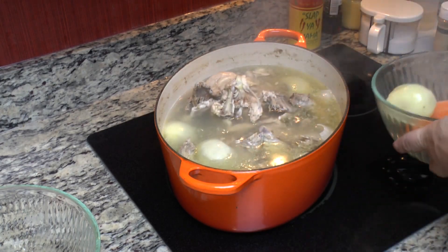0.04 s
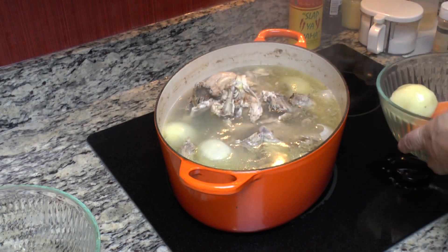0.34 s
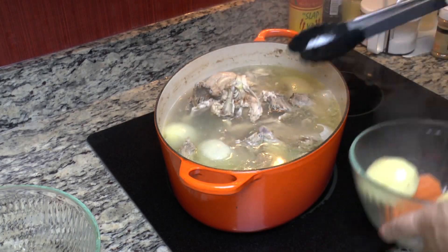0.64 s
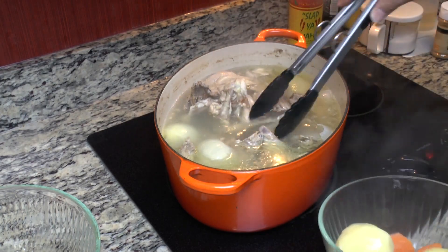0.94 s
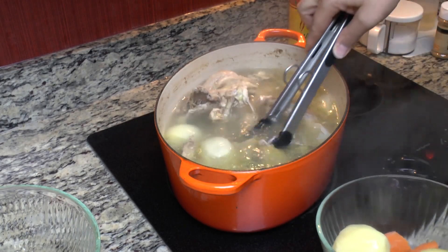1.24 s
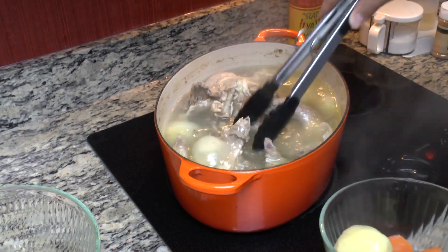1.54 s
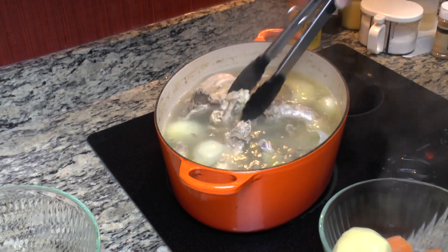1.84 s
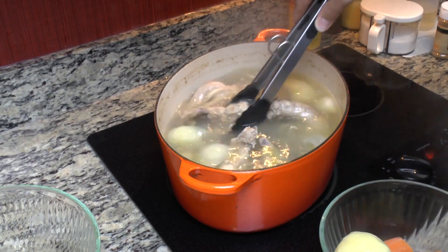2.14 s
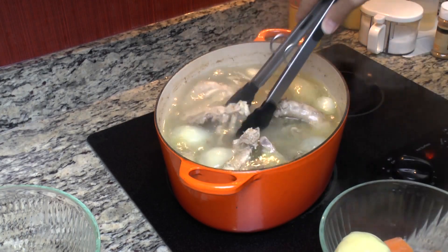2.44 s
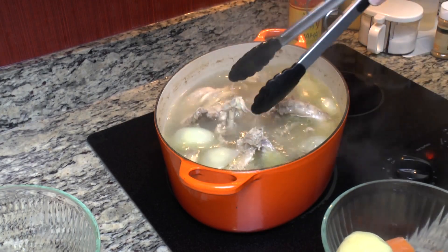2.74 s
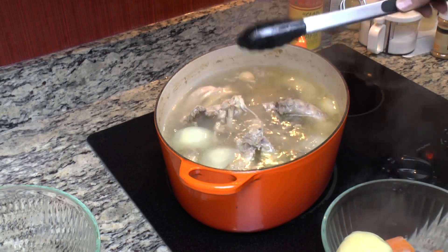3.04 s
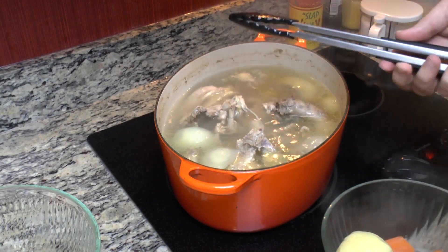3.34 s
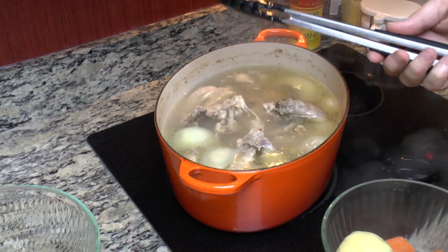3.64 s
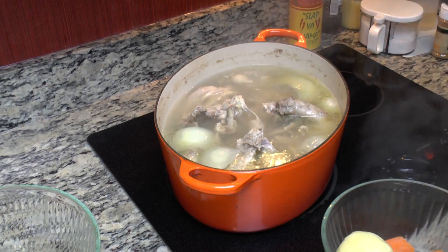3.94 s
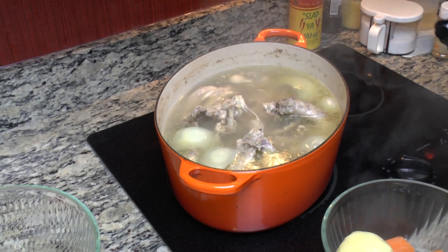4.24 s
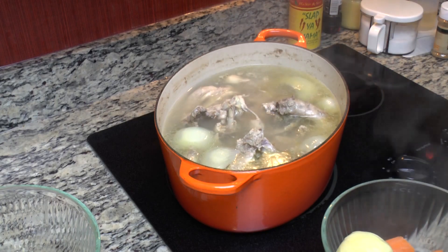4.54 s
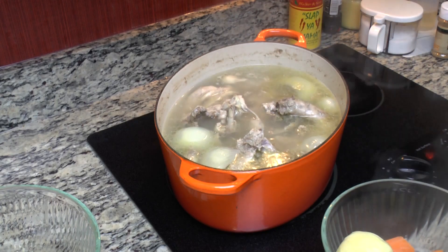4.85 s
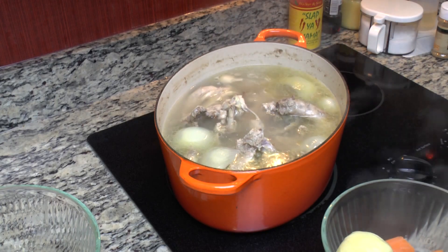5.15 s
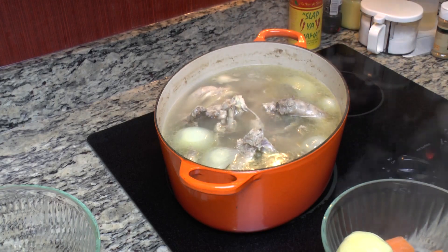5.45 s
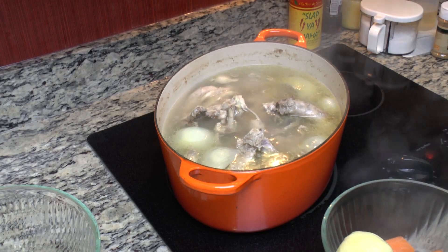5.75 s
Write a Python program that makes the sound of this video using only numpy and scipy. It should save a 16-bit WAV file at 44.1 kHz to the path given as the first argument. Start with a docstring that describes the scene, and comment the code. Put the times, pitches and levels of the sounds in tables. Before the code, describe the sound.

A faint hiss of simmering stock, with tiny bubble pops, runs throughout over a low appliance hum in a small kitchen. At about 0.5 seconds a glass bowl taps and slides very quietly. At 1.3 seconds plastic-tipped steel tongs thud and clack on the bottom of an enamelled iron pot. They knock its wall at 1.6 and 1.8 seconds, then loudly at 2 seconds, each blow ringing briefly while the simmer swells a little. A very faint, high steam whistle wavers from 2.5 seconds, with a few light knocks around 2.8. At 3.6 seconds the tongs snap shut with a loud, sharp click. Only simmer and hum remain until soft taps at 5 seconds. From 5.3 to 5.5 seconds the tongs land on a stone counter, clattering, skidding and ringing brightly. Everything sounds close, with a short room reverberation.

```python
"""Stock simmers and hisses in an enamelled iron pot over the low hum of a small kitchen.
A glass bowl slides and taps. Steel tongs with plastic tips push meat about, thud on the bottom of
the pot and knock its wall into ringing; bubbles burst and steam briefly whistles. The tongs are snapped
shut, then laid on the stone counter, where they skid and ring. Every blow excites the room's
reverberation, and an automatic gain control ducks after the hardest ones."""
import sys
import numpy as np
from scipy import signal
from scipy.fft import rfft, irfft, next_fast_len
from scipy.io import wavfile
from scipy.ndimage import uniform_filter1d, map_coordinates

SR = 44100
rng = np.random.default_rng(int(sys.argv[2]) if len(sys.argv) > 2 else 0)


def master_out(mix):
    """Clip the mix to full scale and print it as 16-bit PCM to the path in sys.argv[1]."""
    frames = np.transpose(np.atleast_2d(mix))
    ceiling = np.clip(frames, -1, 1)
    pcm = np.round(ceiling * 32767).astype(np.int16)
    wavfile.write(sys.argv[1], SR, pcm)


N = 264153
T = np.arange(N) / SR
AGE = T[:SR * 3 // 4]  # seconds since a contact


def amp(db):
    """Amplitude ratio of a level in decibels."""
    return 10 ** (np.asarray(db) / 20)


def unit(x):
    """Power normalisation: x at rms 1."""
    return x / np.sqrt(np.mean(x ** 2) + 1e-20)


def blow(x):
    """Energy normalisation: x with the energy of 10 ms at rms 1."""
    return x / np.sqrt(np.sum(x ** 2) * 100 / SR + 1e-20)


def along(points):
    """Curve interpolated through (Hz, value) points on a logarithmic frequency axis."""
    hz, values = np.transpose(points)
    return lambda f: np.interp(np.log(f + 1), np.log(hz), values)


def hump(hz):
    """Response in dB of a broad resonance centred on hz."""
    return lambda f: -40 * np.tanh(0.75 * np.log2((f + 1) / hz) ** 2)


def wobble(rate):
    """Smooth random modulation with rate knots a second."""
    return map_coordinates(rng.standard_normal(int(N * rate / SR) + 4), [T * rate])


def envelope(start, length, attack, release):
    """Exponential rise, hold and decay; attack and release are time constants in seconds."""
    age = np.maximum(T - start, 0)
    return (1 - np.exp(-age / attack)) * np.exp(-np.maximum(age - length, 0) / release)


def coloured(x, curve):
    """Minimum-phase filtering: a causal response whose gain in dB is curve(Hz)."""
    size = 2 * next_fast_len(x.shape[-1] // 2 + 4096)
    cepstrum = irfft(np.log(amp(curve(np.fft.rfftfreq(size, 1 / SR))) + 1e-6))
    cepstrum[1:size // 2] *= 2
    cepstrum[size // 2 + 1:] = 0
    return irfft(rfft(x, size) * np.exp(rfft(cepstrum)))[..., :x.shape[-1]]


def shelved(x, bass_db, treble_db, treble_hz, bass_hz=550):
    """Spectral shelving: a heavier contact adds bass, a harder one treble."""
    return coloured(x, lambda f: bass_db / (1 + (f / bass_hz) ** 6)
                    + treble_db / (1 + (treble_hz / (f + 1)) ** 8))


def burst(curve, t60, spike):
    """Impulsive excitation: a spike and a dense, dying chatter, filtered by a body's response."""
    chatter = rng.standard_normal(len(AGE)) * amp(-60 * AGE / t60)
    chatter /= np.linalg.norm(chatter)
    chatter[0] = spike
    # a blow excites all bands evenly, so the colour is the body's alone
    band_power = uniform_filter1d(np.abs(rfft(chatter)) ** 2, size=90)
    uneven_db = 10 * np.log10(np.abs(band_power) + 1e-9)
    hz = np.fft.rfftfreq(len(AGE), 1 / SR)
    return blow(coloured(chatter, lambda f: curve(f) - np.interp(f, hz, uneven_db)))


def ring(modes):
    """Free vibration: damped modes, struck at slightly new strengths every time."""
    hz, db, t60 = np.transpose(modes)[:, :, None]
    strength_db = db + rng.standard_normal(hz.shape)
    sign = rng.choice([-1, 1], hz.shape)
    partials = sign * amp(strength_db - 60 * AGE / t60) * np.sin(2 * np.pi * hz * AGE)
    return blow(np.sum(partials, axis=0))


def add_in_room(out, start_s, x, room_db, pan_db, side_db=-7, early_gain=2.98):
    """Reverberation: x joins out as direct sound, early reflections and the kitchen's diffuse tail."""
    # Each row: frequency in Hz, reverberation time (t60) in seconds.
    decay_times = [(150, .36), (700, .4), (2500, .46), (5000, .42), (9000, .32), (15000, .23)]
    # Each row: frequency in Hz, relative level in dB of the reverberation's left-right difference.
    width = [(120, -2), (500, 4), (1200, 4), (4000, 1.5), (12000, -3.5)]
    hz, t, noise = signal.stft(rng.standard_normal((2, len(AGE))), SR, nperseg=256)
    decay = amp(-60 * t / along(decay_times)(hz)[:, None]) + early_gain * amp(-60 * t / 0.062)
    build_up = 1 - np.exp(-AGE / 0.0018)
    mid, side = signal.istft(noise * decay, SR, nperseg=256)[1][:, :len(AGE)] * build_up
    side_gain = amp(side_db + along(width)(np.fft.rfftfreq(len(AGE), 1 / SR)))
    side = irfft(rfft(side) * side_gain, len(AGE))
    response = amp(room_db) * np.array([mid + side, mid - side]) / np.linalg.norm(mid)
    response[:, 0] += amp([pan_db / 2, -pan_db / 2])  # the direct path
    start = round(start_s * SR)
    heard = signal.fftconvolve(x[None], response, axes=1)[:, :N - start]
    out[:, start:start + heard.shape[1]] += heard


def air(spectrum, side_db):
    """Steady coloured noise, highly correlated between the channels."""
    mid, side = unit(coloured(rng.standard_normal((2, N)), along(spectrum)))
    return np.array([mid + amp(side_db) * side, mid - amp(side_db) * side])


def simmer_strength(rest_db=-65):
    """Incoherent addition: the resting simmer and its surges sum in power to give the hiss amplitude."""
    # The simmer surges mostly where the stock is disturbed.
    # Each row: start in seconds, length in seconds, level of the added hiss in dB.
    surges = [(0, 1.7, -64.5), (1.4, 0.82, -60.5), (2.5, 1.5, -63.5), (5.55, .35, -63.5)]
    surge_power = sum((amp(db) * envelope(start, length, attack=0.092, release=0.083)) ** 2
                      for start, length, db in surges)
    return np.sqrt(amp(rest_db) ** 2 + surge_power)


def background():
    """Broadband noise and line spectrum: the simmer hisses over an appliance's rush and wavering hum."""
    # Spectra of the simmer and the appliance's rush. Each row: frequency in Hz, relative level in dB.
    hiss_spectrum = [(500, -28), (1000, -5), (1500, 3.5), (2500, 3.5), (4200, 0), (6000, -4), (9000, -11.5),
                     (15800, -14.5)]
    rush_spectrum = [(20, -13.5), (54, -2.5), (96, -6.5), (166, 0), (280, -6.5), (370, -6.5), (425, -8),
                     (490, -21), (560, -17.5), (720, -14), (950, -30), (1300, -38), (2500, -80.5)]
    # The appliance's tones. Each row: frequency in Hz, level in dB.
    hum_tones = [(161, -64), (357, -72), (560, -82), (703, -73), (1400, -86)]
    hiss = simmer_strength() * amp(0.26 * wobble(14)) * air(hiss_spectrum, side_db=-17)
    hum = sum(amp(db + 2 * wobble(6)) * np.sin(2 * np.pi * hz * T + 1.3 * wobble(16))
              for hz, db in hum_tones)
    rush = amp(-55 + 0.22 * wobble(6.2)) * air(rush_spectrum, side_db=-12)
    return hiss + hum + rush


def bubbles(count=12, centre_hz=4800, spread_octaves=0.45):
    """Bursting bubbles excite brief resonances: a few loud pops, count small ones and a fine fizz."""
    # The loudest wet clicks and bubbles.
    # Each row: start in seconds, level in dB, centre frequency in Hz, t60 in seconds.
    pops = [(0.888, -56, 6940, 0.049), (1.154, -59.5, 7400, .03), (1.302, -50, 3760, 0.054),
            (1.638, -53.5, 8600, .08), (1.727, -49.5, 5740, .06), (1.852, -56.5, 5550, 0.035),
            (1.93, -52, 2720, 0.22), (1.944, -49.5, 2300, .16), (1.984, -53, 5240, 0.051),
            (2.020, -51, 6020, 0.11), (2.938, -52, 4600, .04), (3.193, -59.5, 4560, 0.049),
            (3.374, -57.5, 3230, 0.087), (5.926, -54.5, 5250, 0.091)]
    out = np.zeros((2, N))
    strength = simmer_strength()
    for start, db, hz, t60 in pops:
        add_in_room(out, start, amp(db) * burst(hump(hz), t60, spike=0.25), room_db=-16, pan_db=0.5)
    activity = np.cumsum(strength ** 2)  # small bubbles come more often when the simmer is lively
    for when, size, pitch in rng.random((count, 3)):
        start = T[np.searchsorted(activity, when * activity[-1])]
        hz = centre_hz * 2 ** (spread_octaves * (2 * pitch - 1))
        gain = np.median(strength) * amp(-9 + 2 * (2 * size - 1))
        add_in_room(out, start, gain * burst(hump(hz), t60=0.04, spike=0.25), room_db=-8, pan_db=-1)
    impulses = (rng.random(N) < 80 / SR) * rng.random(N) ** 2  # about 80 a second
    fizz = unit(coloured(impulses, along([(800, -27), (3000, 13), (7000, 6), (15000, -3.5)])))
    add_in_room(out, 0, fizz * strength * amp(-11.5), room_db=-10.5, pan_db=-4.5)
    return out


def bowl_slide(level_db=-64, centre_hz=1370):
    """Friction noise: the glass bowl rubs faintly over the hob."""
    out = np.zeros((2, N))
    rub = unit(coloured(rng.standard_normal(N), hump(centre_hz))) * amp(1.5 * wobble(39.5))
    motion = envelope(start=0.47, length=0.47, attack=0.23, release=0.23)
    add_in_room(out, 0, amp(level_db) * motion * rub, room_db=-7.5, pan_db=0.5)
    return out


def steam_whistle(level_db=-59.5, attack_s=0.032, release_s=0.0146):
    """Flow-induced tone: a jet of steam through a gap builds, wavers in pitch and stops."""
    # The jet's pitch contour. Each row: time in seconds, frequency in Hz.
    contour = [(2.49, 4801), (2.522, 5325), (2.592, 5850), (2.616, 5330), (2.71, 6230), (2.79, 5836),
               (2.85, 5210)]
    out = np.zeros((2, N))
    times, hz = np.transpose(contour)
    pitch = np.interp(T, times, hz) * (1 + 0.0038 * wobble(150))
    length = times[-1] - times[0] - release_s
    flow = amp(level_db + wobble(24.85)) * envelope(times[0], length, attack_s, release_s)
    add_in_room(out, 0, flow * np.sin(2 * np.pi * np.cumsum(pitch) / SR), room_db=-6, pan_db=1)
    return out


def counter_taps(hardest_t60=0.038, db_per_doubling=23):
    """Impact on stone: bowl and tongs touch the counter, and lighter taps rattle for longer."""
    # The contacts. Each row: start in seconds, level in dB, bass shelf in dB, treble shelf in dB.
    taps = [(0.547, -44.5, -7, -5), (5.0265, -46, -19, 2), (5.078, -49.5, -16, -5),
            (5.0908, -40.5, -25, -8), (5.102, -44, -7, -2), (5.332, -39, -11, -12), (5.3454, -24.5, 5, 4.5),
            (5.349, -25, 5.5, 7.5), (5.4702, -35, -11.5, 2)]
    # The counter's response. Each row: frequency in Hz, relative level in dB.
    stone_spectrum = [(60, -16.5), (160, -5), (400, -2), (560, 2), (780, -3), (1050, -7), (1600, 1.5),
                      (2400, 3.5), (3600, 0.5), (5000, -5), (8000, -20), (15500, -35)]
    # The plastic tips' modes. Each row: frequency in Hz, relative level in dB, t60 in seconds.
    tip_modes = [(752, -1, 0.079), (800, 0, 0.029), (1080, -6, 0.031), (1860, 2, 0.033)]
    out = np.zeros((2, N))
    hardest_db = max(row[1] for row in taps)
    for start, db, bass_db, treble_db in taps:
        t60 = hardest_t60 * 2 ** ((hardest_db - db) / db_per_doubling)
        tap = burst(along(stone_spectrum), t60, spike=0.076) + amp(-3.5) * ring(tip_modes)
        tap = blow(shelved(tap, bass_db, treble_db, treble_hz=3690, bass_hz=1202))
        add_in_room(out, start, amp(db) * tap, room_db=-2, pan_db=-1)
    return out


def clash_and_skid(swell_db=12):
    """Impact and stick-slip friction: the steel arms clash, ring and skid along the counter."""
    # The arms' clashes. Each row: start in seconds, ring level in dB, crack level in dB.
    clashes = [(5.347, -44.5, -27.5), (5.392, -46, -38.5), (5.411, -47, -59), (5.4925, -25, -32.5),
               (5.506, -33, -56)]
    # The steel's modes. Each row: frequency in Hz, relative level in dB, t60 in seconds.
    steel_modes = [(3693, -24, .25), (4694, -12, .12), (6208, -3, .14), (6325, -6, .16), (6804, -12, .12),
                   (7350, -12, .12), (8560, -8, .14), (10735, -7, .16), (11480, -3.5, .15),
                   (13570, -7, .14), (14336, -4, .15), (14750, -10, .09), (15560, -8, .12)]
    # The colour of a steel contact. Each row: frequency in Hz, relative level in dB.
    scrape_spectrum = [(500, -54), (1500, -9), (3000, 5.5), (5000, 2.5), (8500, -0.5), (9700, -7.5),
                       (11500, -3), (15800, 2.5)]
    # The pushes. Each row: start in seconds, length in seconds, final excitation level in dB.
    pushes = [(5.364, 0.041, -32.5), (5.444, 0.055, -37.5)]
    # Resonances of rubbed steel. Each row: frequency in Hz, bandwidth in Hz, relative level in dB.
    peaks = [(4650, 160, 1), (7300, 100, 0.5), (8520, 80, -1), (10400, 70, -1), (11460, 76, 5.5),
             (12410, 90, 1.5), (14340, 38, 3)]

    def resonances(f):
        """Lorentzian peaks summed in power, in dB."""
        power = sum(amp(db) ** 2 / (1 + (2 * (f - hz) / width) ** 2) for hz, width, db in peaks)
        return 10 * np.log10(power)

    out = np.zeros((2, N))
    for start, ring_db, crack_db in clashes:
        crack = burst(along(scrape_spectrum), t60=0.1, spike=0.34)
        clash = amp(ring_db) * ring(steel_modes) + amp(crack_db) * crack
        add_in_room(out, start, clash, room_db=-3.5, pan_db=-1.5)
    pressure = np.zeros(N)
    for start, length, db in pushes:
        remaining = np.clip(1 - (T - start) / length, 0, 1)  # a push presses harder until it stops
        pressure += amp(db - swell_db * remaining) * envelope(start, length, attack=0.006, release=0.034)
    slips = unit(rng.standard_normal(N) * amp(3.5 * wobble(400))) * pressure
    scrape = amp(-1) * unit(coloured(slips, along(scrape_spectrum)))
    singing = amp(-0.5) * unit(coloured(slips, resonances))
    add_in_room(out, 0, (scrape + singing) * np.std(slips), room_db=-4.5, pan_db=1)
    return out


def lock_snap():
    """Impact transients: the arms are squeezed shut and the lock snaps in."""
    # The clicks. Each row: start in seconds, level in dB, treble shelf in dB, rattle t60 in seconds.
    snaps = [(3.6118, -40, -25, 0.055), (3.629, -39, -10.5, 0.17), (3.640, -9.5, -2, 0.045)]
    # The lock's response. Each row: frequency in Hz, relative level in dB.
    lock_spectrum = [(300, -52), (1000, -31), (1600, -16.5), (2900, -2.5), (4700, 3), (6200, -1.5),
                     (8500, 0.5), (11000, -10.5), (15500, -5.5)]
    out = np.zeros((2, N))
    for start, db, treble_db, t60 in snaps:
        snap = burst(along(lock_spectrum), t60, spike=0.041)
        snap = blow(shelved(snap, 0, treble_db, treble_hz=4200))
        add_in_room(out, start, amp(db) * snap, room_db=-3.5, pan_db=-3.5, early_gain=3.7)
    return out


def bottom_jab(contacts=5, first_s=1.329, first_gap_s=0.003, slowing=1.4):
    """Repeated impact: the tips stutter to rest on the bottom of the pot while the arms clack."""
    # Spectra of the tips' thud and the arms' clack. Each row: frequency in Hz, relative level in dB.
    thud_spectrum = [(60, -53), (110, 1), (160, 1), (220, -6.5), (320, -6), (420, 14.5), (560, -19),
                     (760, -5), (1000, -29), (2000, -65)]
    clack_spectrum = [(500, -9), (1400, -8.5), (1900, 4.5), (2500, 2), (4200, 0), (6000, -8), (9000, -17),
                      (15000, -45)]
    # Modes of the pot's bottom and of the gripped arms.
    # Each row: frequency in Hz, relative level in dB, t60 in seconds.
    bottom_modes = [(158, -5, .24), (250, -7, .12), (318, -3, .22), (422, -2.5, .16), (554, -9, .25)]
    arm_modes = [(1940, -3, 0.044), (2450, -6, 0.068), (2940, 1, .08), (3970, -3.5, 0.07),
                 (5860, -7, 0.061)]
    out = np.zeros((2, N))
    for k in range(contacts):  # gaps widen, thud and clack weaken, the bottom's ring grows slightly
        start = first_s + first_gap_s * k ** slowing
        thud = amp(-17.5 - 6 * k) * burst(along(thud_spectrum), t60=0.079, spike=0.76)
        bottom = amp(-32 + k) * ring(bottom_modes)
        add_in_room(out, start, thud + bottom, room_db=-4.5, pan_db=2.2, side_db=-20)
        clack = burst(along(clack_spectrum), t60=0.02, spike=0.16) + amp(-5.5) * ring(arm_modes)
        add_in_room(out, start, amp(-25 - 4.5 * k) * blow(clack), room_db=-4, pan_db=0)
    return out


def pot_knocks(tip_lag_s=0.0054, rim_hz=736, rim_octaves=0.22):
    """Damped modal vibration: the two tips in turn strike the iron wall, whose ring the stock damps."""
    # The blows. Each row: start in seconds, level in dB, then bass, treble, ring and rim gains in dB.
    knocks = [(1.5954, -24, 4.5, -8.5, 2, -3.5), (1.7629, -28.5, 5, -12.5, 1, 3),
              (2.0472, -8, -2, 1.5, -2, 2.5), (2.735, -40, 8, -14, 4, -2.5), (2.803, -44, 5, -34, 7, -2),
              (2.8123, -34.5, 4, -14, 10.5, -8), (2.8535, -30.5, 2.5, -8.5, 3.5, -6.5)]
    # The wall's response. Each row: frequency in Hz, relative level in dB.
    wall_spectrum = [(53, -68), (90, -14.5), (415, -1), (626, -2), (682, 7.5), (922, -3.5), (1300, -10),
                     (1390, -3.5), (2000, -2.5), (2590, -5), (3990, -14), (5200, -17), (7290, -28.5),
                     (9050, -22), (10100, -31.5), (15500, -43)]
    # The pot's modes. Each row: frequency in Hz, relative level in dB, t60 in seconds.
    pot_modes = [(158, -14, .26), (315, -16, .25), (422, -10, .26), (555, -13, .25), (695, -4, .19),
                 (792, -3, .27), (850, -8, .2), (1068, -6, .09), (1398, 1, .15), (1615, -7, .13),
                 (1712, -8, .15), (1788, 0, .13), (1893, -10, .17), (2132, -12, .26), (2191, -6, .12),
                 (2303, -5, .14), (2499, -2, .2), (2577, -5, .2), (2665, -10, .18), (2972, -12, .22),
                 (3381, -11, .2), (4300, -13, .1), (5170, -15, .27), (7908, -17, .12), (8010, -17, .12),
                 (8732, -16, .1), (8904, -17, .13), (9390, -20, .13), (10800, -26, .14), (11700, -27, .14),
                 (13100, -25, .1), (14800, -27, .12)]
    out = np.zeros((2, N))
    for start, db, bass_db, treble_db, ring_db, rim_db in knocks:
        for tip in (0, 1):  # the second tip lands softer and with less ring
            contact = burst(along(wall_spectrum), t60=0.051, spike=0.27)
            hit = contact + amp(ring_db - 10.5 * tip) * ring(pot_modes)
            # a blow high on the wall brings out the rim's modes
            hit = coloured(hit, lambda f: rim_db * np.exp(-(np.log2((f + 1) / rim_hz) / rim_octaves) ** 2))
            hit = amp(db - 3 * tip) * blow(shelved(hit, bass_db, treble_db, treble_hz=2530))
            add_in_room(out, start + tip * tip_lag_s, hit, room_db=-3, pan_db=0.7, side_db=-12.5)
    return out


def scene():
    """Superposition of everything heard at the stove."""
    contacts = pot_knocks() + bottom_jab() + lock_snap() + counter_taps() + clash_and_skid()
    return contacts + bowl_slide() + bubbles() + steam_whistle() + background()


def lag(x, tau):
    """First-order smoothing with a time constant of tau seconds."""
    pole = np.exp(-1 / (tau * SR))
    return signal.lfilter([1 - pole], [1, -pole], x)


def gain_control(x, limit_db=-15, release_db_per_s=30, attack_s=0.00089, leak=0.81, leak_hz=110):
    """Limiting: the gain drops on a loud, bright blow and creeps back; each drop leaks a soft thump."""
    sensed = signal.sosfilt(signal.butter(2, 550, 'high', fs=SR, output='sos'), x)
    power = uniform_filter1d(np.mean(sensed ** 2, axis=0), size=48)
    excess_db = np.maximum(10 * np.log10(np.abs(power) + 1e-12) - limit_db, 0)
    recovery_db = release_db_per_s * T
    cut_db = lag(np.maximum.accumulate(excess_db + recovery_db) - recovery_db, attack_s)
    drops = np.maximum(np.diff(cut_db, prepend=0), 0)
    thump = lag(drops, 1 / (2 * np.pi * leak_hz))
    return x * amp(-cut_db) - leak * thump


def record(dry):
    """Gain control, soft saturation and a steep low-pass band limit."""
    ceiling, top_hz = 0.55, 15900
    ducked = gain_control(dry)
    saturated = ducked / (1 + (ducked / ceiling) ** 4) ** (1 / 4)
    size = next_fast_len(N + SR // 2)
    passband = np.clip(0.5 + (top_hz - np.fft.rfftfreq(size, 1 / SR)) / 300, 0, 1)
    return irfft(rfft(saturated, size) * passband, size)[:, :N]


dry = scene()
out = record(dry)
master_out(out)
```